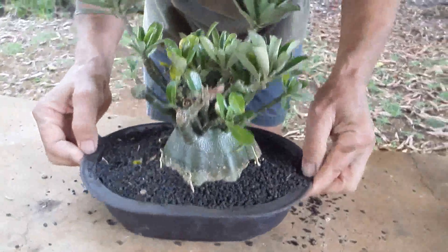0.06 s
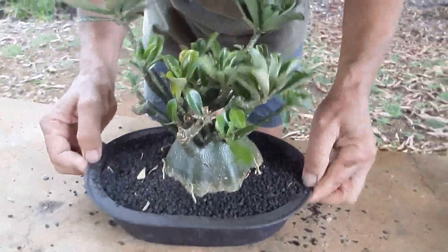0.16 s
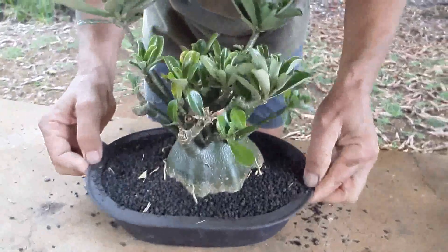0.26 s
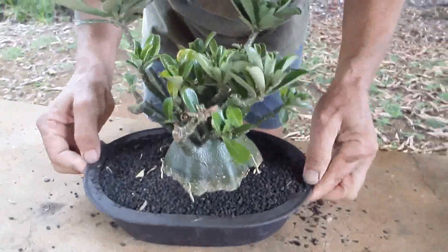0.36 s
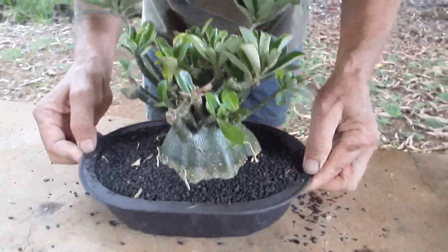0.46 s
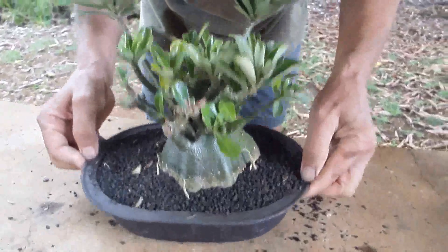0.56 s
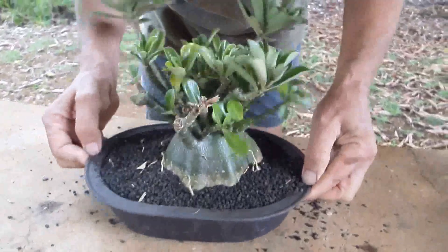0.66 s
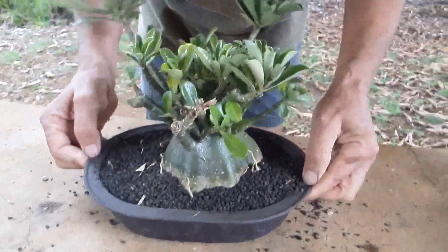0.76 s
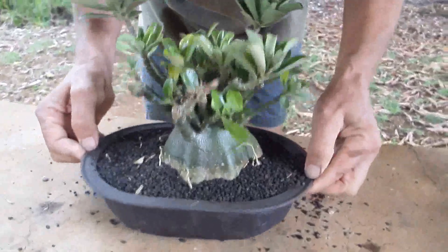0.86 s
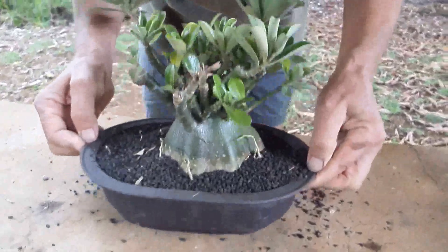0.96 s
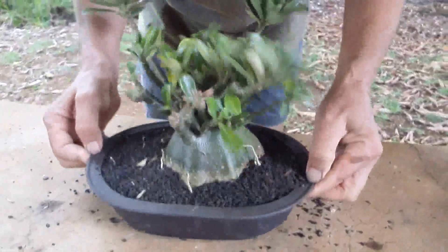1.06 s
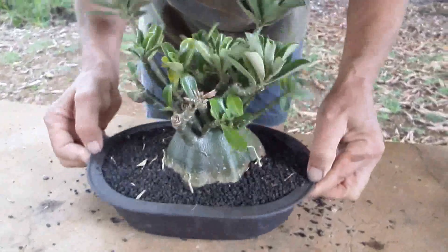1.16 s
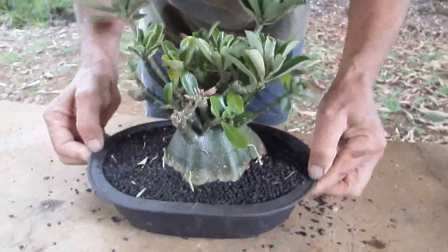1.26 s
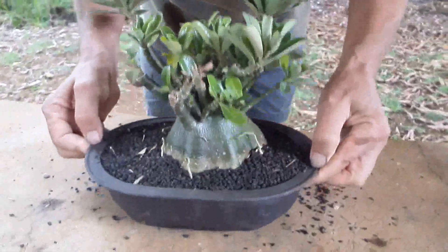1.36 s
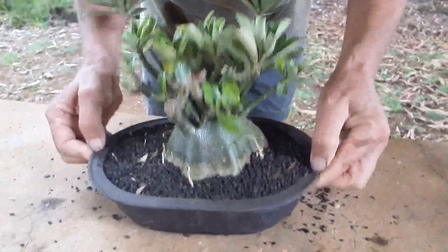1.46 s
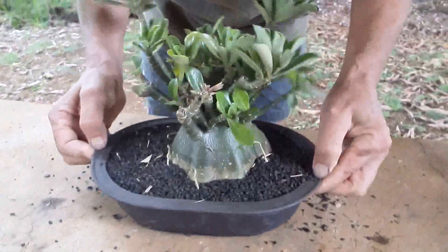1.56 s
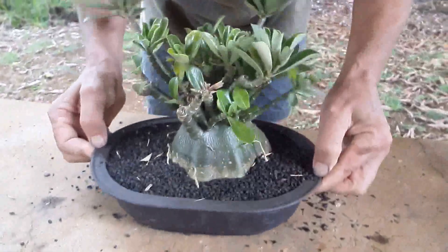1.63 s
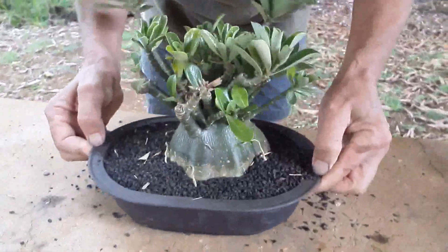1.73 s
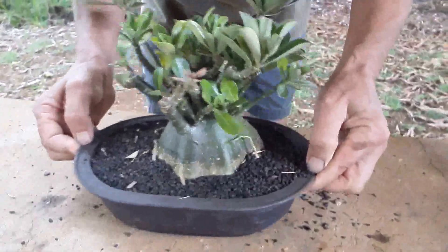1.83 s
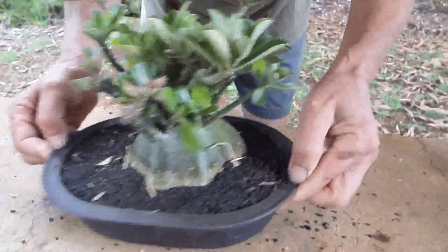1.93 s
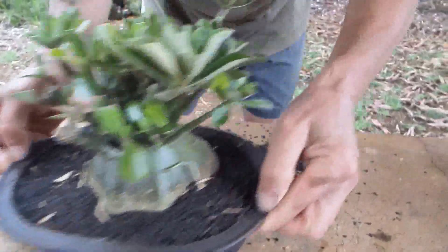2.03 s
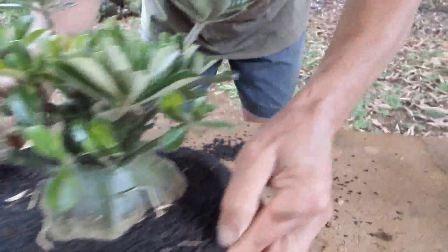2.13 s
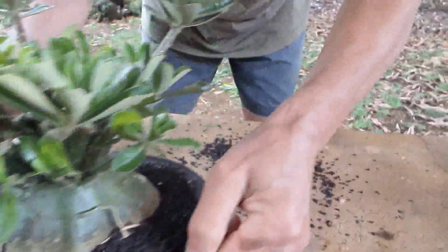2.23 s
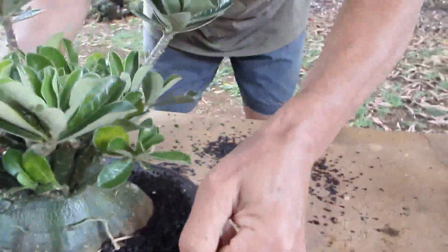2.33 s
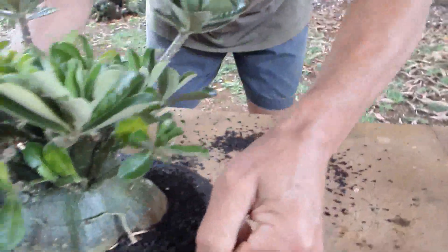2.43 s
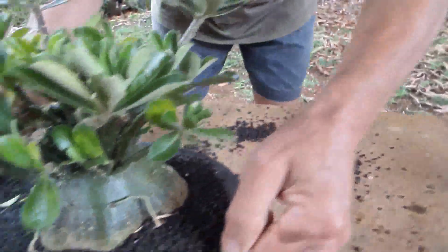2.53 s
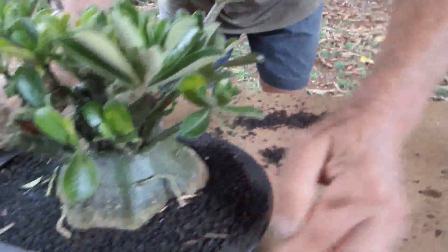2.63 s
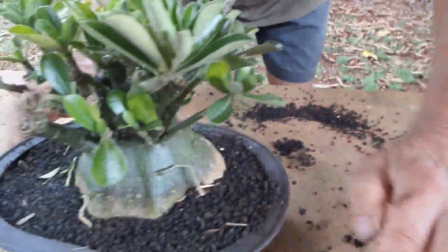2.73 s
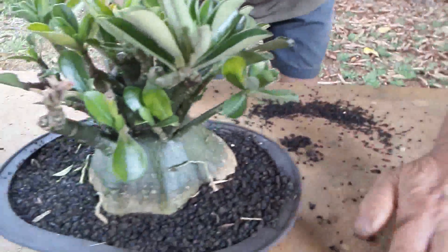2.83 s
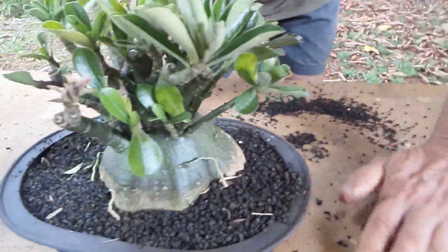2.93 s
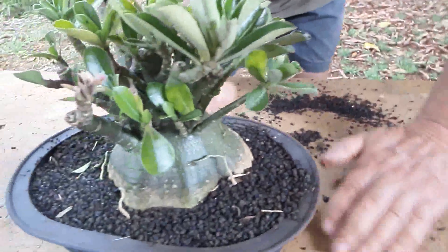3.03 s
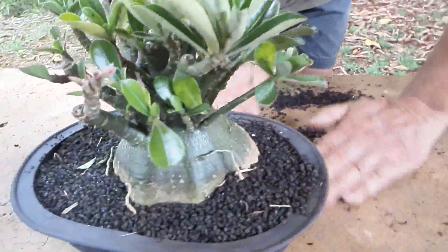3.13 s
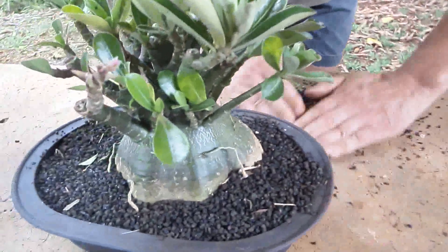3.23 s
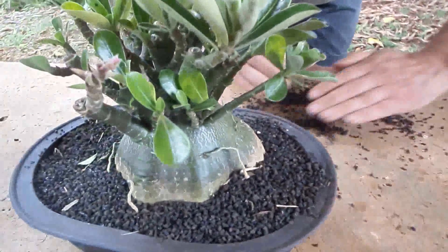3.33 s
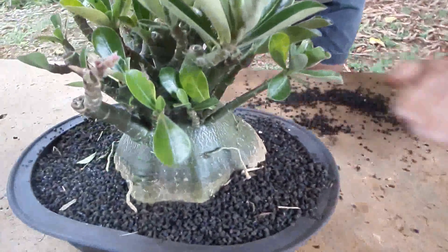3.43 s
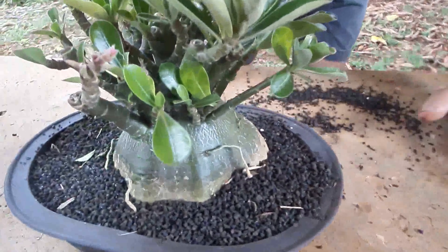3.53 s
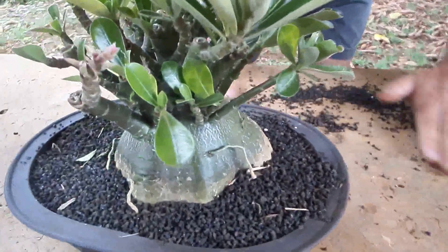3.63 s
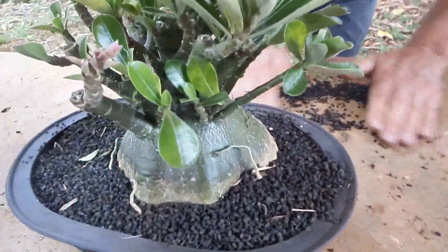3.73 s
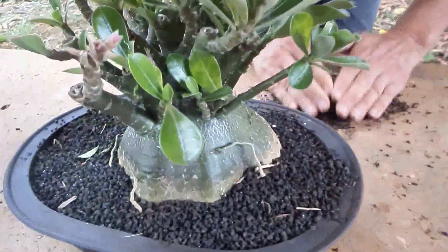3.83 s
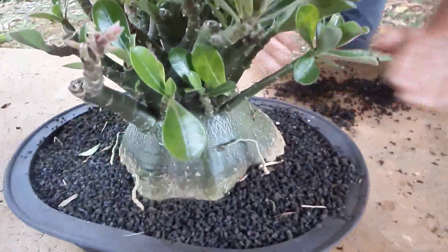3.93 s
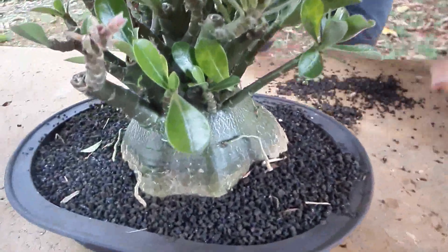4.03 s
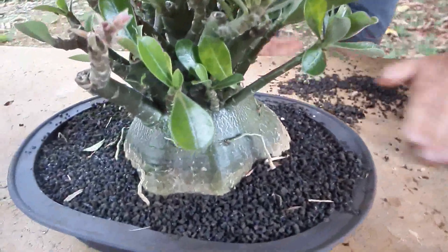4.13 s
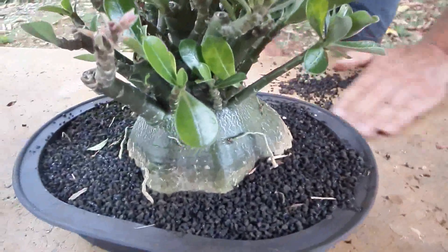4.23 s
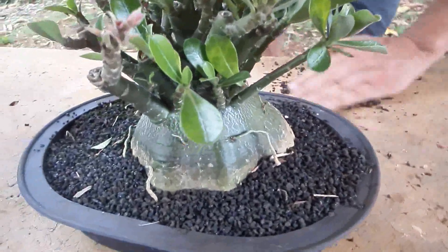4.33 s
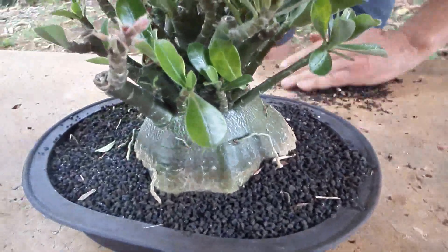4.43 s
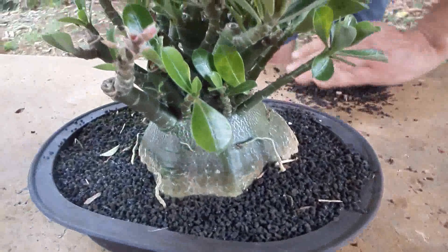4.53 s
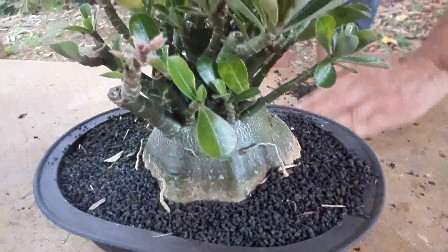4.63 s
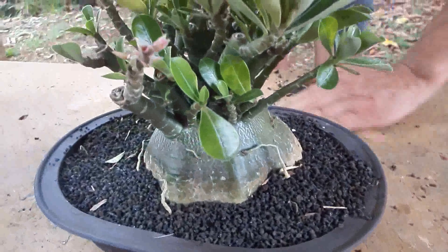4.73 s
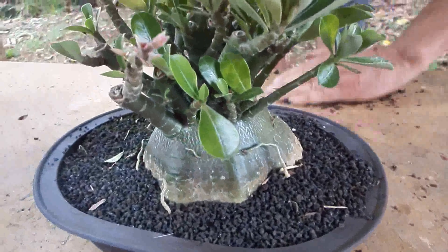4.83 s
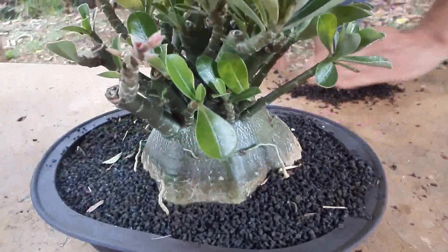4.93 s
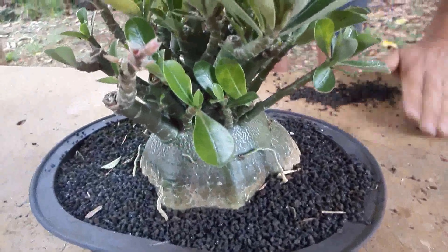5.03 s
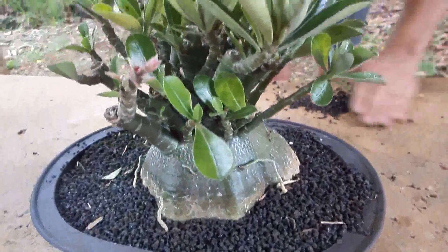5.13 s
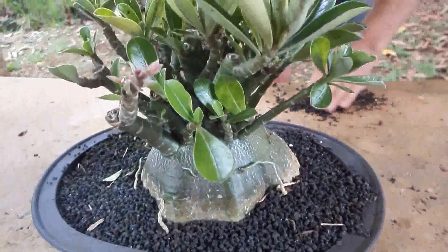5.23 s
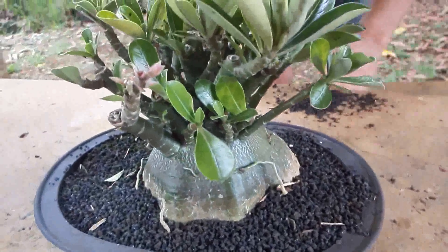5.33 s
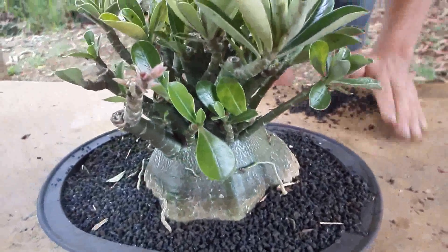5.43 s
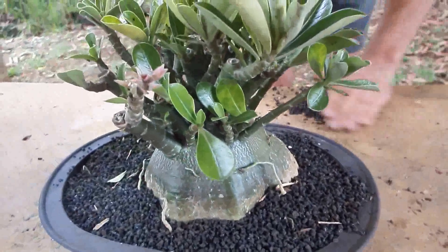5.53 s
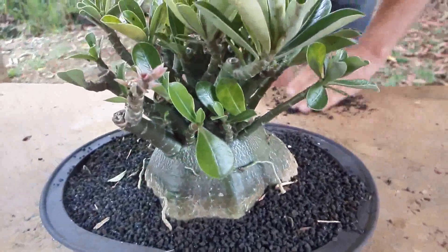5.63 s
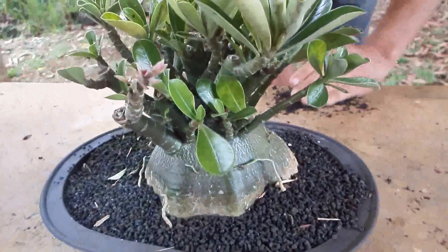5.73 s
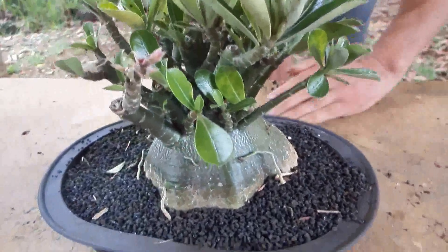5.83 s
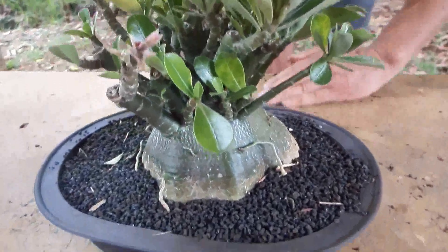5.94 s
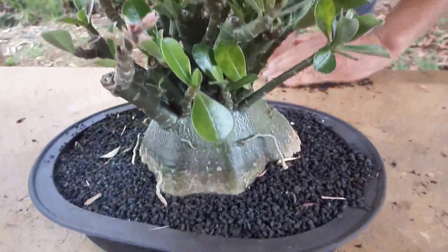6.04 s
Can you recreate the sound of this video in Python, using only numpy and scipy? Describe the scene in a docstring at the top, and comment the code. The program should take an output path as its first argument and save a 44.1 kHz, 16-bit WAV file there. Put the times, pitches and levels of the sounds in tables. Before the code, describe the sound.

A grit-filled pot is thumped four times and set down softly, followed by dry hand-sweeping of granules, with roosters crowing across a quiet yard.

```python
"""Faint yard air and a low drone run throughout; roosters crow in shaky or clear harmonic notes.
A plastic pot of grit is knocked four times on a table under a porch roof: damped modes plus grit clicks.
Small birds chirp in raspy gliding whistles. The pot is set down softly at about 2.6 s.
Then a palm wipes spilled grit across the table: dense grains that follow the speed of the hand,
with a few dull crunches as its edge lands."""
import sys
import numpy as np
from scipy import signal
from scipy.fft import rfft, irfft
from scipy.io import wavfile
from scipy.ndimage import uniform_filter1d

SR = 44100
rng = np.random.default_rng(int(sys.argv[2]) if len(sys.argv) > 2 else 0)


def wav_out(sig):
    """Save sig, one row per channel (or a flat mono array), as 16-bit PCM at SR to the path in sys.argv[1]."""
    wavfile.write(sys.argv[1], SR, np.round(np.clip(np.atleast_2d(sig).T, -1, 1) * 32767).astype(np.int16))


N = 268569
TIME_S = np.arange(N) / SR

# Levels in the tables are relative, before the trims in the functions; spectra set colour only.
# Likeness of left and right in noise. Each row: frequency in Hz, correlation.
STEREO_CORRELATION = [(30, .45), (120, 0.9), (700, 0.75), (1500, 0.8), (3000, 0.88), (6000, 0.51),
                      (10000, 0.26), (15000, 0.49)]

# Still outdoor air. Each row: frequency in Hz, density in dB per Hz.
AIR_SPECTRUM = [(20, -23.5), (50, -14.5), (100, -7.5), (140, -9), (280, -22.5), (480, -15), (850, -17),
                (1600, -19.5), (2500, -31.5), (3300, -24), (4200, -20), (7500, -19.5), (13500, -15),
                (16000, -17)]
AIR_DB = -55
# Low distant drone that swells. Each row: time in seconds, level in dB.
DRONE_LEVEL = [(0, -65), (1.0, -63), (2.0, -69.5), (2.6, -62), (3.2, -57.5), (3.8, -55.5), (4.6, -54.5),
               (5.3, -55.5), (6.09, -55)]
# Colour of the drone. Each row: frequency in Hz, density in dB per Hz.
DRONE_SPECTRUM = [(40, -43.5), (85, -24.5), (110, 0.5), (140, -6), (210, -2), (300, -4.5), (450, -17),
                  (1000, -13.5), (2000, -20.5), (5000, -36.5)]

# Rooster notes, far and smooth or near and hoarse. Each row: start in seconds, length in seconds,
# first pitch in Hz, last pitch in Hz, arch as a share of the pitch, fundamental in dB, octave in dB,
# hoarseness (0 = clear, about 1 = hoarse).
CROW_NOTES = [(0.01, 0.78, 852, 834, .024, -75, -62.5, 0.36), (0.919, 0.13, 714, 698, .008, -78, -65.5, .3),
              (3.579, 0.14, 775, 795.5, 0.0467, -50, -57.5, 0.77),
              (3.614, .1, 936, 908, -0.0011, -56, -52, 0.28), (3.687, 0.26, 700, 775, -.02, -60, -56, 0.88),
              (3.907, 0.18, 990, 922, .02, -46.5, -53, 1.12),
              (4.168, 0.191, 1048, 1018, .002, -48.5, -54.5, 0.66),
              (5.43, 0.17, 976, 930, 0.026, -57.5, -58, 0.67),
              (5.46, 0.13, 895, 876, .001, -68, -56.5, 0.2)]
CROW_EDGE_S, HOARSE_JITTER_SHARE, HOARSE_JITTER_HZ = 0.023, .055, 195
# Two long clear notes of the nearest rooster, one list each. Each row: time in seconds, pitch in Hz,
# fundamental in dB, octave in dB.
CLEAR_NOTES = [
    [(4.06, 952, -49.5, -47), (4.138, 952.4, -47, -46.5), (4.222, 974, -49, -58),
     (4.408, 937, -47.5, -47.5), (4.54, 960, -52, -62)],
    [(4.74, 928.4, -49, -47), (4.908, 917, -57, -68), (4.922, 904, -52, -43), (5.014, 923, -61, -55),
     (5.186, 902, -47, -48.5), (5.224, 898.6, -58, -85), (5.276, 901, -44.5, -48.5),
     (5.42, 892, -58, -48.5), (5.44, 902, -54, -51)],
]
CLEAR_JITTER_SHARE, CLEAR_TRIM_DB = 0.00596, -1

# Pot meets table. Each row: time in seconds, level in dB, pitch factor on the modes,
# crack of the grit in dB, shower of falling grit in dB.
POT_BLOWS = [(0.075, -37, 1.84, -35, -56), (0.3139, -5, 1.03, -14.5, -16.5),
             (0.3237, 0, 1.008, -34.5, -45.5), (0.7923, 1, 1.03, -18, -23.5),
             (0.8065, -3.5, 0.91, -32.5, -28.5), (1.1905, -40, 1.14, -44, -68), (1.2568, 0, 0.95, -17, -15),
             (1.6819, -19, 1.13, -19.5, -31), (1.688, 2.5, 1.01, -21, -28.5),
             (1.7117, -12.5, 0.97, -52, -32.5), (2.559, -32, 0.77, -41, -48.5),
             (2.574, -39.5, 0.84, -45, -43)]
CRACK_RISE_S, CRACK_DECAY_S = 0.00085, 0.0018
FALL_RISE_S, FALL_DECAY_S = 0.0069, 0.0069
# Loose grit shifts under the pot or a fingertip. Each row: start in seconds, level in dB, decay in seconds.
GRIT_TICKS = [(0.047, -43.5, 0.005), (0.501, -49.5, 0.015), (0.852, -33, 0.0074), (0.998, -48, .006),
              (2.799, -33.5, 0.0088), (3.721, -42.5, 0.011), (4.706, -41, 0.0027), (4.776, -43, 0.045),
              (5.248, -43, 0.006)]
TICK_RISE_SHARE = 0.2  # of the decay
# Colour of the grit clicks. Each row: frequency in Hz, density in dB per Hz.
GRIT_SPECTRUM = [(150, -13.5), (600, 3), (1300, 3.5), (2100, -1.5), (3400, 5.5), (4000, 3), (5000, -0.5),
                 (6700, -1), (8300, 2.5), (10500, 0.5), (13000, -6), (16000, -20)]
# Colour of their echo. Each row: frequency in Hz, density in dB per Hz.
GRIT_ECHO_SPECTRUM = [(200, -9), (800, 7.5), (2000, -4.5), (3600, 3.5), (5000, -1.5), (10000, -4),
                      (16000, -12)]

# Modes of pot and table top. Each row: frequency in Hz, level in dB, t60 in seconds.
POT_MODES = [(223, -38, 0.015), (292, -40, .14), (555, -23, 0.13), (758, -11.5, 0.0379), (842, -6, 0.028),
             (1076, -9.5, 0.025), (1176, -12, 0.014), (1524, -29, 0.028), (1850, -23.5, 0.015),
             (3010, -32, 0.019), (3560, -25.5, 0.028)]
NODE_HZ, NODE_WIDTH_HZ = 975, 60  # neighbouring modes cancel here
# Decay of the porch echo. Each row: frequency in Hz, t60 in seconds.
PORCH_T60 = [(150, 0.29), (500, 0.23), (900, 0.31), (2000, 0.34), (4000, 0.34), (9000, 0.14), (15000, 0.5)]

# Bird chirps. Each row: start in seconds, length in seconds, first pitch in Hz, last pitch in Hz,
# arch as a share of the pitch, level in dB.
BIRD_CHIRPS = [(1.542, 0.05, 4640, 4380, -0.034, -57), (2.465, 0.064, 3760, 4750, -0.029, -52.5),
               (2.66, .135, 4620, 5570, -.11, -52.5), (2.856, .052, 4650, 3300, .02, -50),
               (2.892, 0.055, 3520, 4320, 0.046, -57.5), (3.56, 0.084, 3260, 3800, -.01, -52),
               (3.687, .11, 2940, 3200, 0.018, -55), (4.823, .15, 2708, 3717, 0.068, -47.5)]
CHIRP_EDGE_S, CHIRP_JITTER_SHARE = 0.014, .03

# Palm strokes. Each row: start in seconds, length in seconds, moment of top speed as a share of the length,
# hiss of the skin in dB, drone of the table top in dB.
PALM_STROKES = [(2.754, 0.067, 0.65, -43, -48), (3.055, 0.21, 0.61, -39, -45),
                (3.213, 0.29, 0.7, -37.5, -47.5), (3.743, 0.32, 0.57, -38.5, -47.5),
                (4.262, 0.084, .45, -40.5, -54), (4.302, 0.15, 0.93, -44.5, -48.5),
                (4.427, 0.27, 0.35, -39.5, -47.5), (4.879, 0.27, 0.57, -41, -44.5),
                (5.253, 0.075, 0.86, -40, -52.5), (5.322, 0.14, 0.26, -37.5, -47),
                (5.67, 0.086, 0.84, -48, -53.5), (5.733, 0.12, 0.31, -39, -48.5)]
SKIN_POWER, BOARD_POWER = 0.79, 0.48  # exponents of hand speed
# Hiss of skin and grit. Each row: frequency in Hz, density in dB per Hz.
SKIN_SPECTRUM = [(1200, -41), (2200, -14), (3300, -8), (4200, -4), (5500, -2.5), (7500, -1.5), (10500, 1.5),
                 (13000, 0), (16000, -8)]
# Drone of the table top. Each row: frequency in Hz, density in dB per Hz.
BOARD_SPECTRUM = [(100, -12), (240, -12), (420, -7.5), (620, 5), (760, -1.5), (980, 5), (1200, 4.5),
                  (1520, 6), (1900, -2.5), (3000, -2.5), (6000, -5)]

# Edge of the hand lands on the table. Each row: start in seconds, level in dB.
HAND_LANDINGS = [(3.076, -44.5), (4.588, -47.5), (4.914, -44.5)]
LANDING_RISE_S, LANDING_DECAY_S = 0.0082, 0.075
# Colour of the landing. Each row: frequency in Hz, density in dB per Hz.
LANDING_SPECTRUM = [(200, -28), (700, -19), (1000, 4), (1300, 1), (1600, 10), (2100, -8.5), (3000, -3),
                    (5000, -16), (12000, -36)]

NOTCH_HZ, NOTCH_WIDTH_HZ, BAND_LIMIT_HZ = 2510, 168, 15850


def amp(db):
    """Decibels to gain."""
    return 10 ** (np.asarray(db) / 20)


def unit(x):
    """Scales to an rms of one."""
    return x / np.sqrt(np.mean(x ** 2) + 1e-20)


def read(points, hz):
    """Reads a table on a log-frequency axis."""
    f, value = np.transpose(points)
    return np.interp(np.log(hz + 1), np.log(f + 1), value)


def add(mix, start_s, sound):
    """Mixes a sound in at a time."""
    part = mix[max(round(start_s * SR), 0):][:len(sound)]
    part += sound[:len(part)]


def pan(db):
    """Opposite gains for left and right."""
    return amp([[db], [-db]])


def wander(rate_hz, size=N):
    """Smooth random curve of unit rms, up to about rate_hz."""
    hz = np.fft.rfftfreq(size, 1 / SR)
    lowpass = np.exp(-(hz / rate_hz) ** 2)
    return unit(irfft(rfft(rng.standard_normal(size)) * lowpass, size))


def stereo_colour(pair, spectrum):
    """Colours two unrelated signals and blends them to the left-right correlation of each band."""
    hz = np.fft.rfftfreq(N, 1 / SR)
    alike = np.clip(read(STEREO_CORRELATION, hz), -.99, .99)
    coloured = rfft(pair) * amp(read(spectrum, hz))
    mid, side = coloured * np.sqrt([1 + alike, 1 - alike])
    return unit(irfft([mid + side, mid - side], N))


def hiss(spectrum):
    """Smooth stereo noise of a given colour."""
    return stereo_colour(rng.standard_normal((2, N)), spectrum)


def grains(spectrum, per_s, spread_db):
    """Random stream of tiny impacts of uneven size."""
    size = amp(spread_db * np.minimum(rng.exponential(1, (2, N)), 4))
    sign = rng.choice([-1, 1], (2, N))
    struck = rng.random((2, N)) < per_s / SR
    return stereo_colour(size * sign * struck, spectrum)


def patchy(x, depth_db, size=5):
    """Shifting reflections lift and sink narrow bands for a moment."""
    z = signal.stft(x, nperseg=1024, noverlap=768)[2]
    field = uniform_filter1d(rng.standard_normal(z.shape[1:]), size, 0)
    field = uniform_filter1d(field, 2 * size, 1)
    varied = z * amp(depth_db * unit(field))
    return unit(signal.istft(varied, nperseg=1024, noverlap=768)[1][:, :N])


def burst(rise_s, decay_s):
    """Straight rise, exponential fall."""
    t = np.arange(SR // 5) / SR
    return np.minimum(t / rise_s, 1) * np.exp(-np.maximum(t - rise_s, 0) / decay_s)


def echoes(x, t60_table, delay_s, width):
    """Sparse reflections of random sign, each band dying at its own speed."""
    taps = rng.choice([-1., 1.], (2, SR)) * (rng.random((2, SR)) < .12)
    hz, t, z = signal.stft(taps, SR, nperseg=256)
    decay = amp(-60 * t / read(t60_table, hz)[:, None])
    tail = signal.istft(z * decay, SR, nperseg=256)[1]
    # silent up to delay_s, full from twice that
    tail *= np.clip(np.arange(tail.shape[1]) / SR / delay_s - 1, 0, 1)
    mid, side = tail / np.linalg.norm(tail[0])
    response = np.array([mid + width * side, mid - width * side])
    return signal.fftconvolve(x[None], response, axes=1)[:, :N]


def lingering(level, t60_s):
    """Echo level that a level curve leaves under the porch, by leaky integration of its energy."""
    keep = np.exp(-2 * np.log(1000) / (t60_s * SR))  # share of energy left after each sample
    return np.sqrt(signal.lfilter([1 - keep], [1, -keep], level ** 2))


def note(length_s, first_hz, last_hz, arch, edge_s, jitter, jitter_hz, flutter_db):
    """An unsteady syrinx glides along an arch: its phase, and a fluttering gain that rises, holds and falls."""
    t = np.arange(SR) / SR
    u = np.minimum(t / length_s, 1)
    hz = (first_hz + (last_hz - first_hz) * u) * (1 + arch * np.sin(np.pi * u))
    phase = 2 * np.pi * np.cumsum(hz * (1 + jitter * wander(jitter_hz, size=SR))) / SR
    gate = np.clip(np.minimum(t, length_s - t) / edge_s, 0, 1)
    return phase, gate * amp(flutter_db * wander(45, size=SR))


def yard(swell_db=0.5, hum_db=-1.5, hum_hz=103, hum_mid_fade_s=4.45):
    """Outdoor air as noise; a low noise drone holds a wavering hum that fades out over a second."""
    air = amp(AIR_DB + swell_db * wander(1.85)) * hiss(AIR_SPECTRUM)
    hz = hum_hz * (1 + 0.036 * wander(12.3))
    hum = amp(hum_db + 2 * wander(4.8)) * np.sin(2 * np.pi * np.cumsum(hz) / SR)
    hum *= np.clip(hum_mid_fade_s + .5 - TIME_S, 0, 1)
    drone_gain = amp(np.interp(TIME_S, *np.transpose(DRONE_LEVEL)))
    return air + drone_gain * (patchy(hiss(DRONE_SPECTRUM), depth_db=4, size=3) + hum)


def syrinx(phase, first, octave, hoarse, third_db=-26, fourth_db=-12):
    """Fundamental and octave set apart; two upper harmonics follow the fundamental, weaker when hoarse."""
    upper = amp(third_db) * np.sin(3 * phase) + amp(fourth_db) * np.sin(4 * phase)
    upper /= 1 + hoarse
    return np.sqrt(2) * (first * (np.sin(phase) + upper) + octave * np.sin(2 * phase))


def crow(length_s, first_hz, last_hz, arch, first_db, octave_db, hoarse):
    """One arched note, whose pitch shakes more the hoarser it is."""
    phase, gain = note(length_s, first_hz, last_hz, arch, CROW_EDGE_S,
                       HOARSE_JITTER_SHARE * hoarse, HOARSE_JITTER_HZ, flutter_db=2.1)
    return gain * syrinx(phase, amp(first_db), amp(octave_db), hoarse)


def held_note(rows, jitter_hz=90, edge_s=0.0081):
    """A long clear note with drifting pitch, whose harmonics swell and fade."""
    s, *controls = np.transpose(rows)
    hz, first_db, octave_db = (np.interp(TIME_S, s, values) for values in controls)
    phase = 2 * np.pi * np.cumsum(hz * (1 + CLEAR_JITTER_SHARE * wander(jitter_hz))) / SR
    gate = np.clip(np.minimum(TIME_S - s[0], s[-1] - TIME_S) / edge_s, 0, 1)
    return amp(CLEAR_TRIM_DB) * gate * syrinx(phase, amp(first_db), amp(octave_db), hoarse=0)


def roosters(direct_db=0.5, wet_db=-2.0, pan_db=-0.5):
    """Arched notes of varied hoarseness and long clear ones, scattered by the trees."""
    voices = sum(held_note(rows) for rows in CLEAR_NOTES)
    for start_s, *shape in CROW_NOTES:
        add(voices, start_s, crow(*shape))
    trees = echoes(voices, [(500, 0.76), (4000, 1.0)], delay_s=0.0064, width=0.55)  # (Hz, t60 s)
    return (amp(direct_db) * voices + amp(wet_db) * trees) * pan(pan_db)


def rattles(wet_db=-6.5, t60_s=0.32, spread_db=1.5):
    """Grit cracks at contact, jumps and lands in showers of clicks; the porch smears them into hiss."""
    shower = np.zeros(N)
    for s, _, _, crack_db, fall_db in POT_BLOWS:
        # the crack peaks at contact
        add(shower, s - CRACK_RISE_S, amp(crack_db) * burst(CRACK_RISE_S, CRACK_DECAY_S))
        add(shower, s, amp(fall_db) * burst(FALL_RISE_S, FALL_DECAY_S))
    for s, db, decay_s in GRIT_TICKS:
        add(shower, s, amp(db) * burst(TICK_RISE_SHARE * decay_s, decay_s))
    clicks = shower * grains(GRIT_SPECTRUM, per_s=9000, spread_db=spread_db)
    diffuse = patchy(hiss(GRIT_ECHO_SPECTRUM), depth_db=3.5)
    return clicks + amp(wet_db) * lingering(shower, t60_s) * diffuse


def knocks(wet_db=-12.5):
    """Each blow rings the heavily damped modes of the loaded pot, a little differently each time."""
    t, blows = np.arange(SR // 4) / SR, np.zeros(N)
    contact = 1 - np.exp(-t / .0005)
    for s, db, pitch, _, _ in POT_BLOWS:
        factors = pitch * (1 + .008 * rng.standard_normal(len(POT_MODES)))
        ring = np.zeros(len(t))
        for (hz, mode_db, t60_s), factor in zip(POT_MODES, factors):
            ring += amp(mode_db - 60 * t / t60_s) * np.sin(2 * np.pi * hz * factor * t)
        add(blows, s, -amp(db) * ring * contact)
    # a small body radiates little bass
    blows = signal.sosfilt(signal.butter(2, 130, "high", fs=SR, output="sos"), blows)
    direct = signal.lfilter(*signal.iirnotch(NODE_HZ, NODE_HZ / NODE_WIDTH_HZ, SR), blows)
    porch = echoes(blows, PORCH_T60, delay_s=.005, width=.3)
    return (direct + amp(wet_db) * porch) * pan(.4)


def birds(direct_db=-4, wet_db=-3):
    """Slightly raspy gliding whistles with an outdoor echo."""
    whistles = np.zeros(N)
    for start_s, *glide, db in BIRD_CHIRPS:
        phase, gain = note(*glide, CHIRP_EDGE_S, jitter=CHIRP_JITTER_SHARE, jitter_hz=400, flutter_db=3)
        add(whistles, start_s, amp(db) * gain * np.sin(phase))
    echo = echoes(whistles, [(2500, 1.0), (6000, 0.29)], delay_s=0.00565, width=0.5)  # (Hz, t60 s)
    return amp(direct_db) * whistles + amp(wet_db) * echo


def hand_speed(start_s, length_s, top_share):
    """The hand speeds up from rest and slows down again, 0 to 1."""
    top_s = start_s + length_s * np.clip(top_share, .05, .95)
    return np.sin(np.pi / 2 * np.interp(TIME_S, [start_s, top_s, start_s + length_s], [0, 1, 0]))


def wiping(skin_db=-0.02, board_db=3, judder_db=0.7, pan_db=-0.5, wet_db=-8, t60_s=0.61):
    """Skin and rolling grit hiss on the table top, which drones under the stroke."""
    skin, board = np.zeros((2, N))
    for start_s, length_s, top_share, hiss_db, drone_db in PALM_STROKES:
        speed = hand_speed(start_s, length_s, top_share)
        skin = np.hypot(skin, amp(hiss_db) * speed ** SKIN_POWER)
        board = np.hypot(board, amp(drone_db) * speed ** BOARD_POWER)
    # echo energy joins the level curves
    skin = np.hypot(skin, amp(wet_db) * lingering(skin, t60_s))
    board = np.hypot(board, amp(wet_db) * lingering(board, t60_s))
    fine = patchy(grains(SKIN_SPECTRUM, per_s=18000, spread_db=2.3), depth_db=2.4)
    coarse = patchy(grains(BOARD_SPECTRUM, per_s=1400, spread_db=3.2), depth_db=3)
    rub = amp(skin_db) * skin * fine * pan(pan_db)
    return (rub + amp(board_db) * board * coarse) * amp(judder_db * wander(53.0))


def landings():
    """The edge of the hand comes down on grit with a short, dull crunch of grains."""
    press = np.zeros(N)
    for s, db in HAND_LANDINGS:
        add(press, s, amp(db) * burst(LANDING_RISE_S, LANDING_DECAY_S))
    return press * grains(LANDING_SPECTRUM, per_s=4700, spread_db=2.2)


def scene():
    """Sum of the yard, the birds and the table."""
    return yard() + roosters() + rattles() + knocks() + birds() + wiping() + landings()


def record(dry):
    """The microphone has a narrow, deep notch, applied twice; then the band limit."""
    notch = signal.iirnotch(NOTCH_HZ, NOTCH_HZ / NOTCH_WIDTH_HZ, SR)
    notched = signal.lfilter(*notch, signal.lfilter(*notch, dry))
    lowpass = signal.firwin(301, BAND_LIMIT_HZ, window=("kaiser", 9), fs=SR)
    return signal.oaconvolve(notched, lowpass[None], "same")


dry = scene()
out = record(dry)
wav_out(out)
```